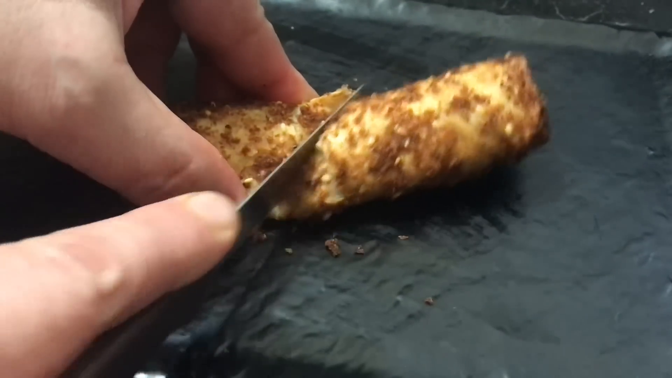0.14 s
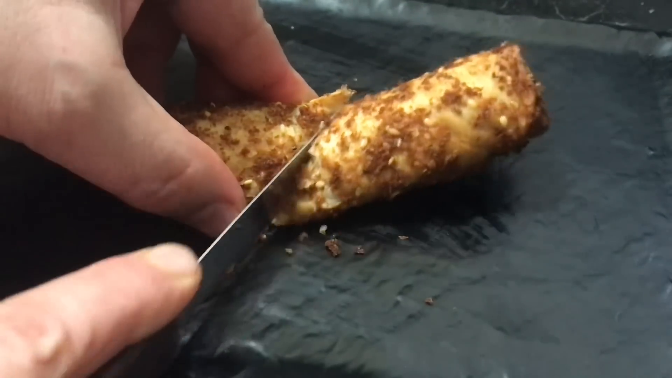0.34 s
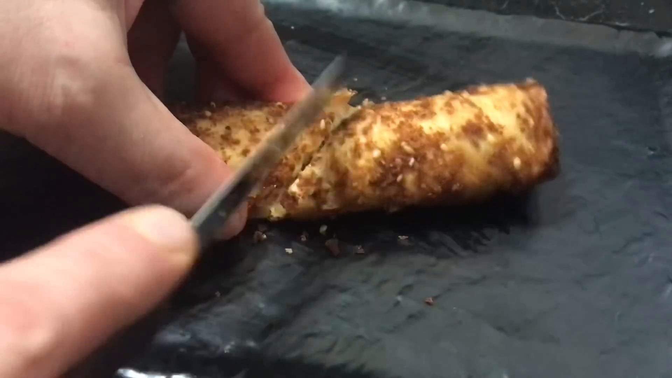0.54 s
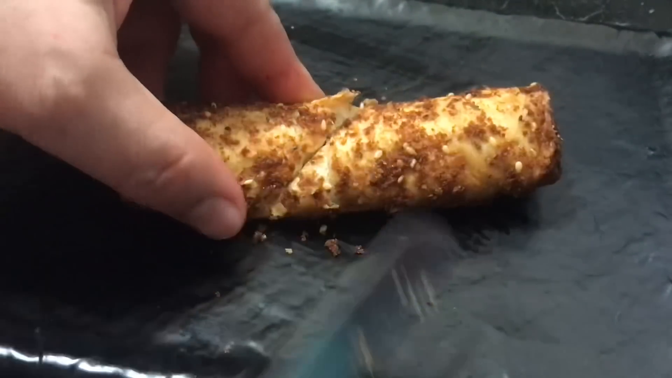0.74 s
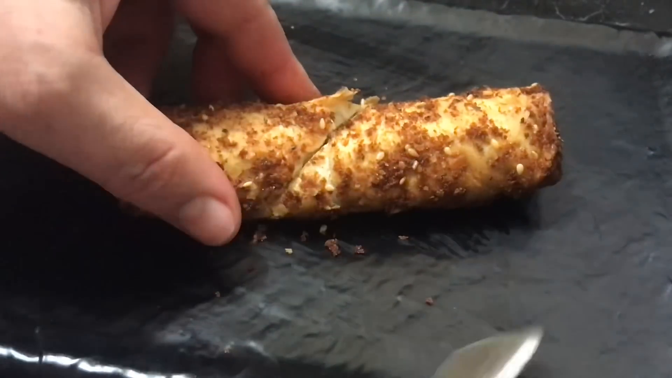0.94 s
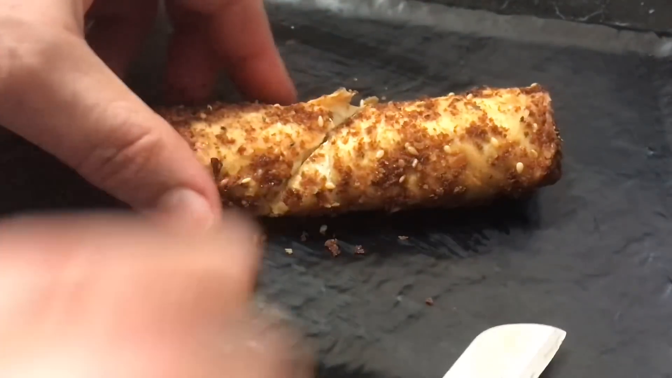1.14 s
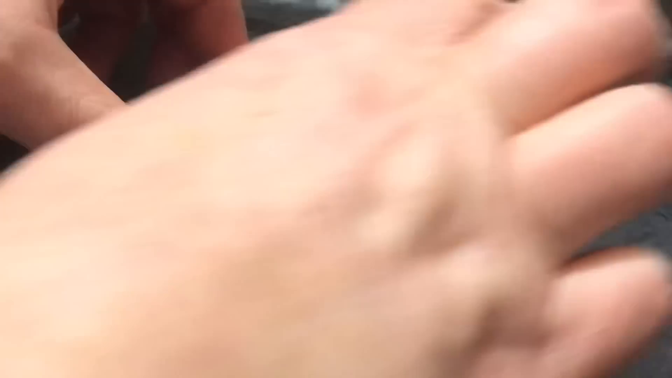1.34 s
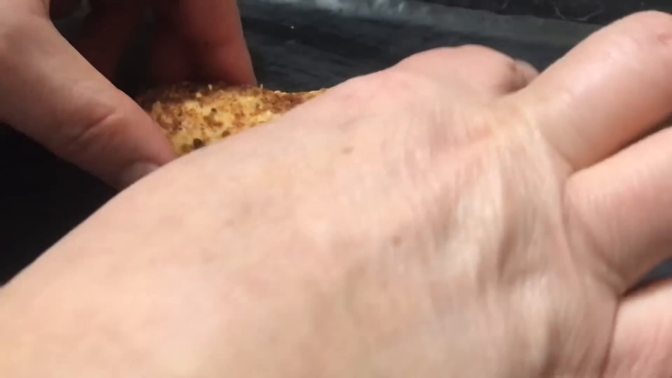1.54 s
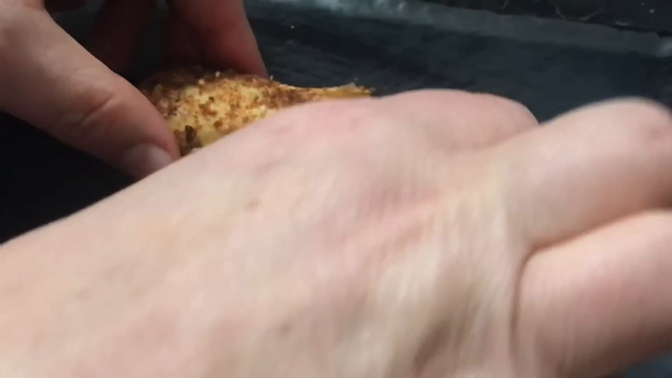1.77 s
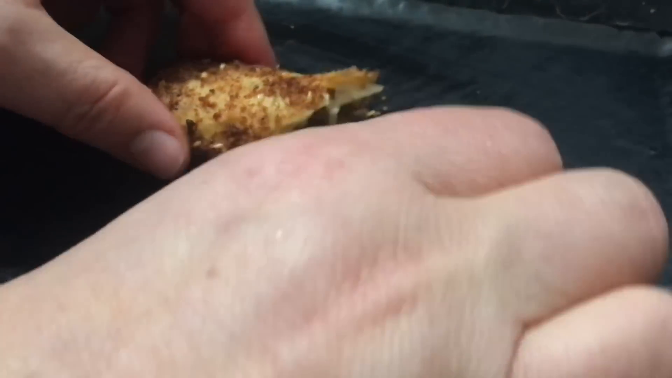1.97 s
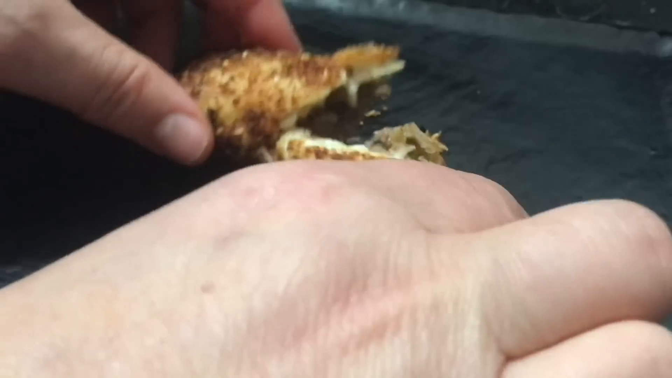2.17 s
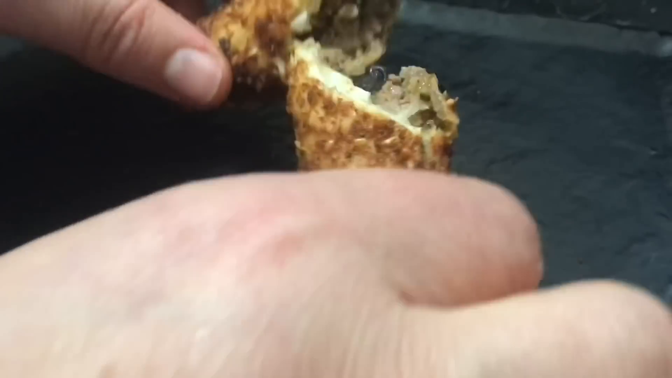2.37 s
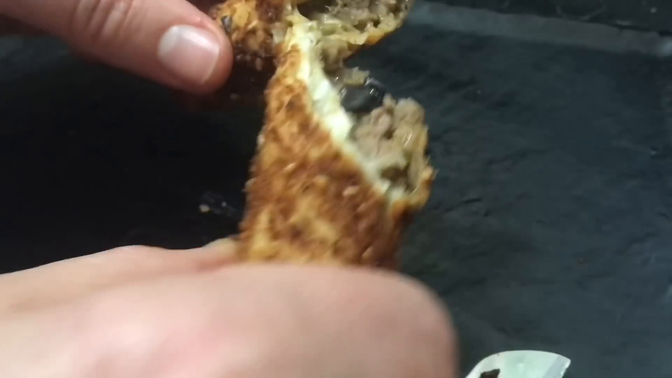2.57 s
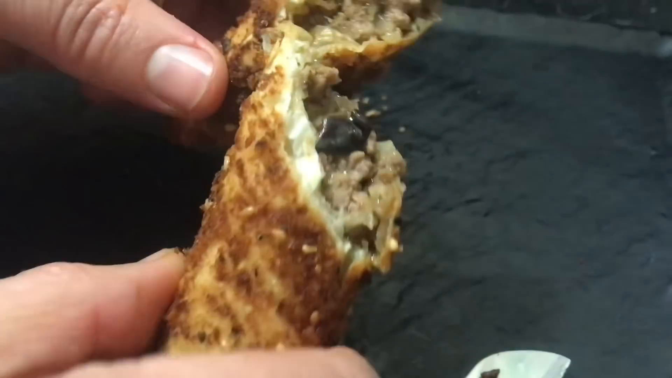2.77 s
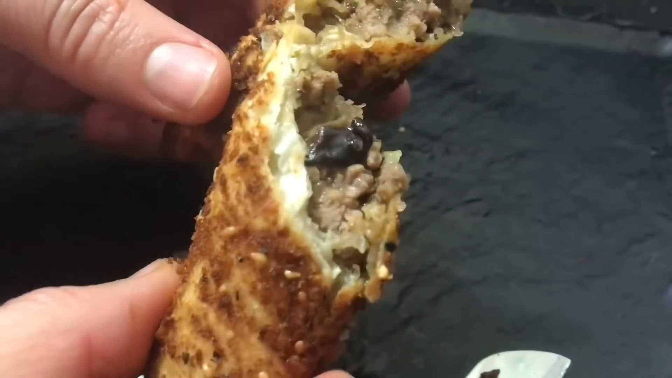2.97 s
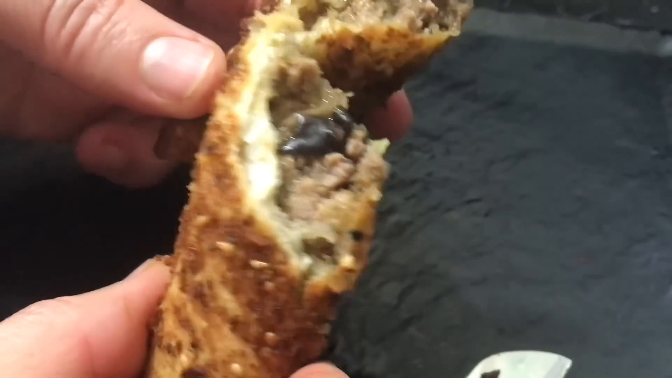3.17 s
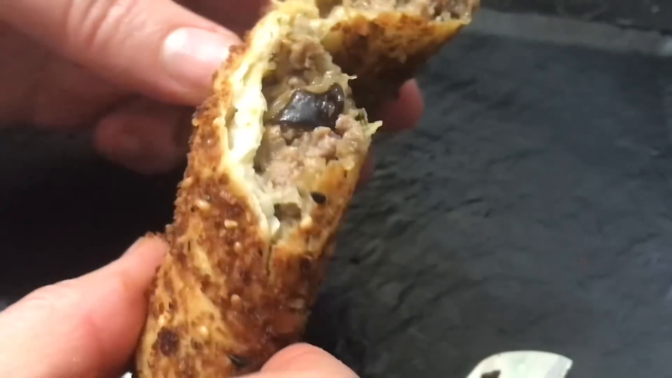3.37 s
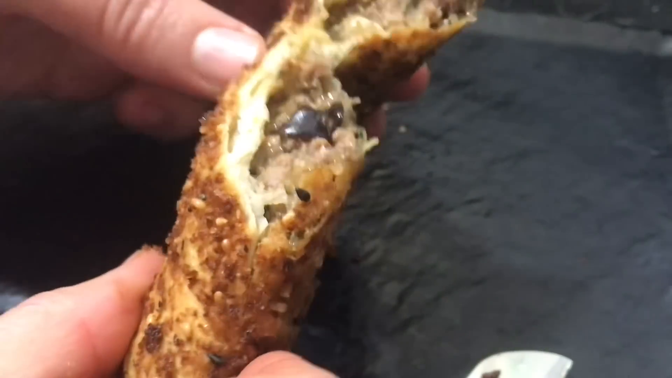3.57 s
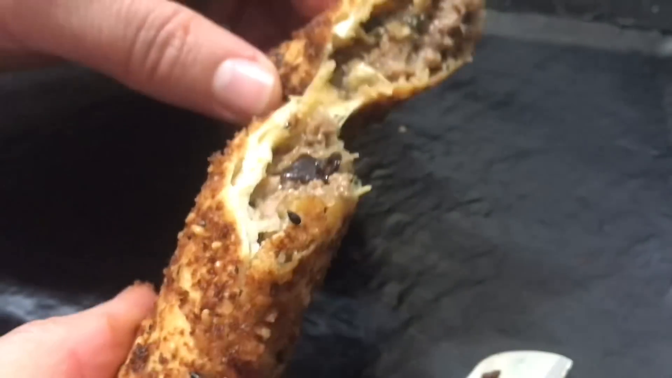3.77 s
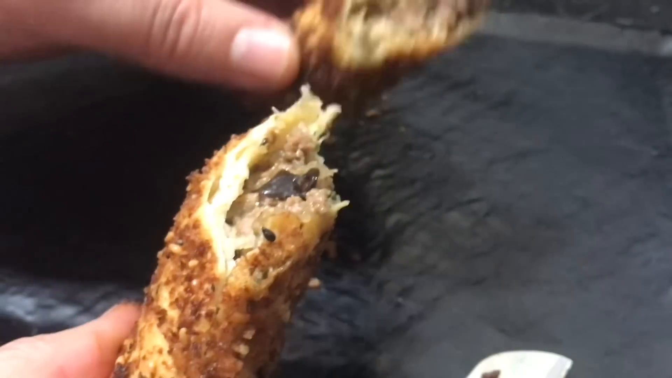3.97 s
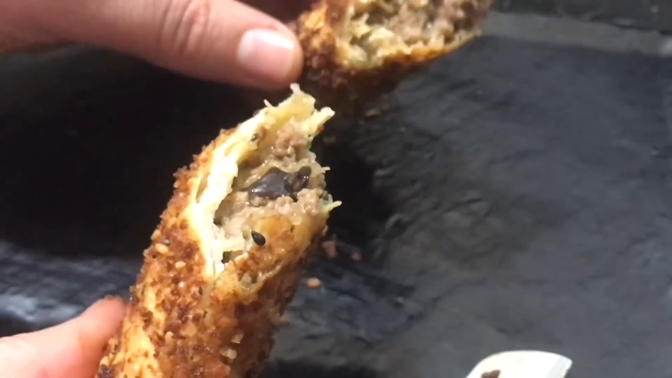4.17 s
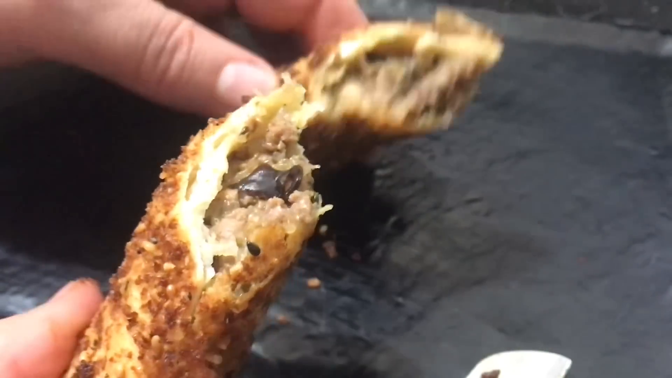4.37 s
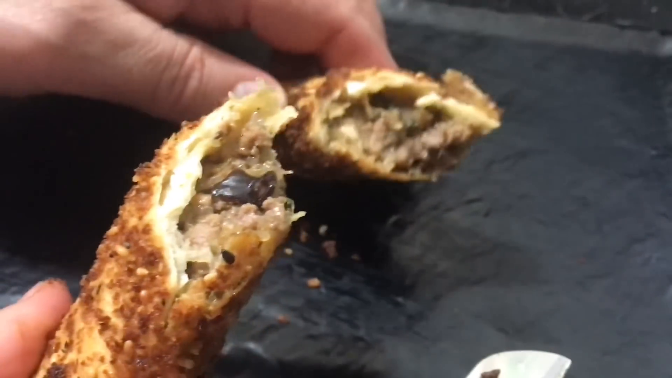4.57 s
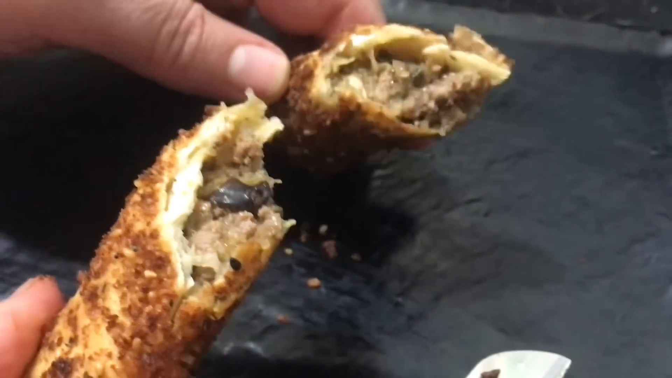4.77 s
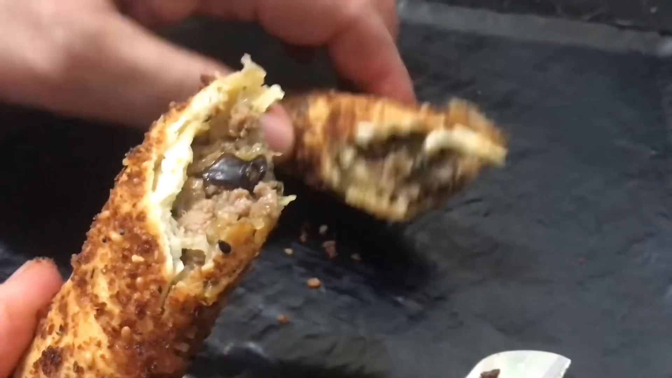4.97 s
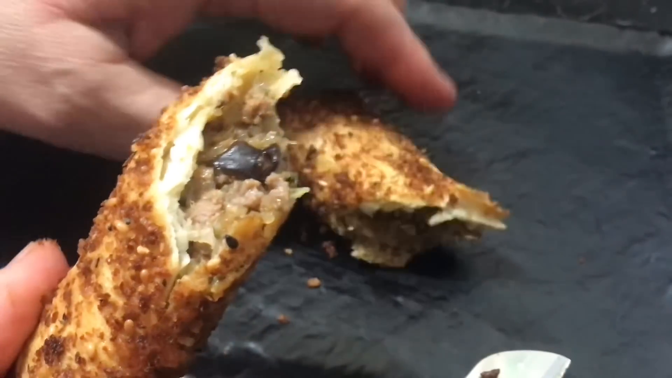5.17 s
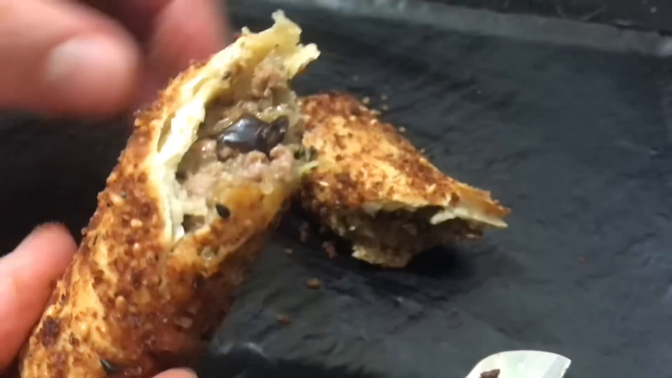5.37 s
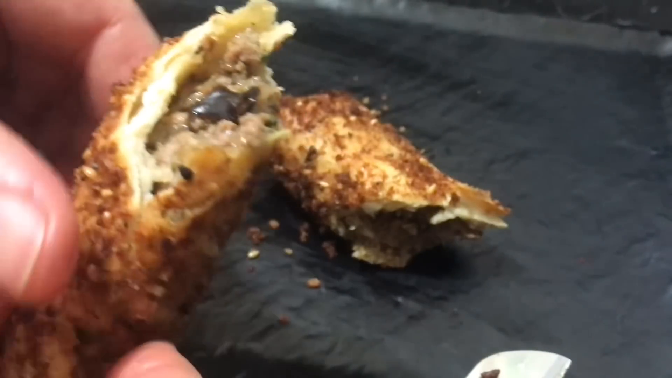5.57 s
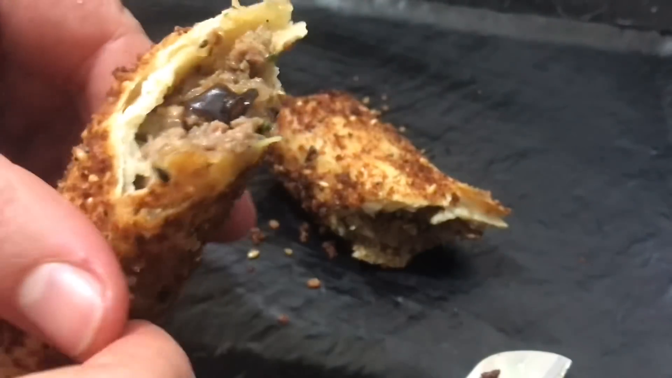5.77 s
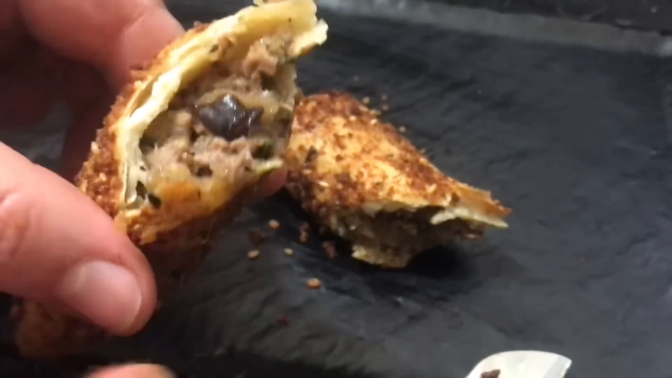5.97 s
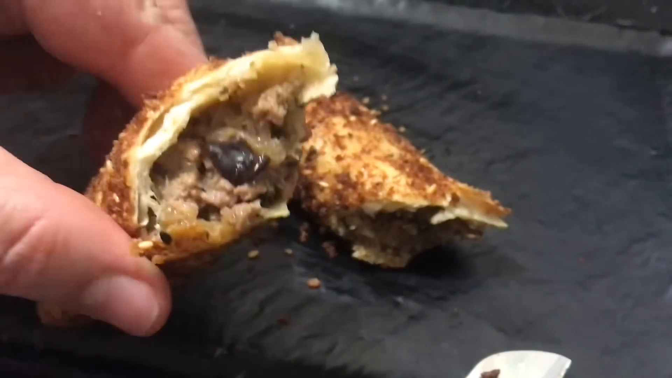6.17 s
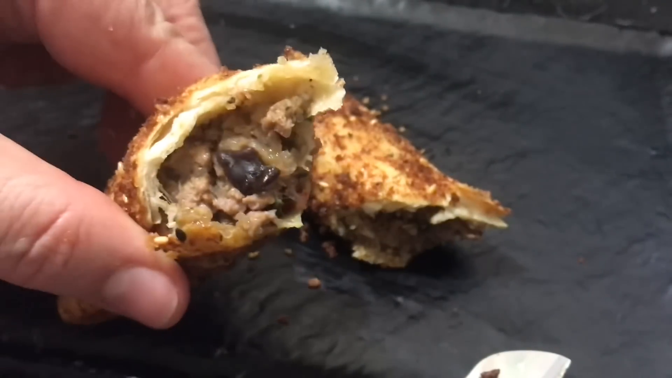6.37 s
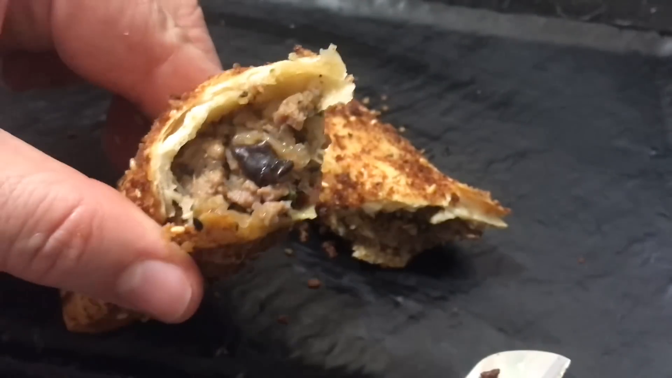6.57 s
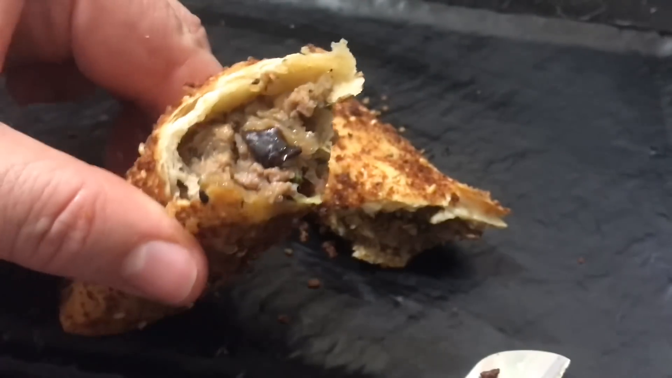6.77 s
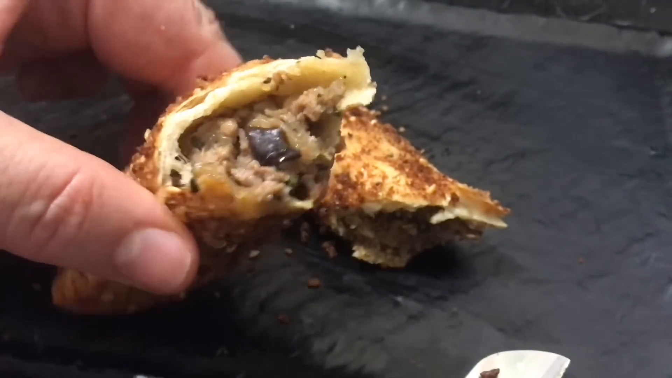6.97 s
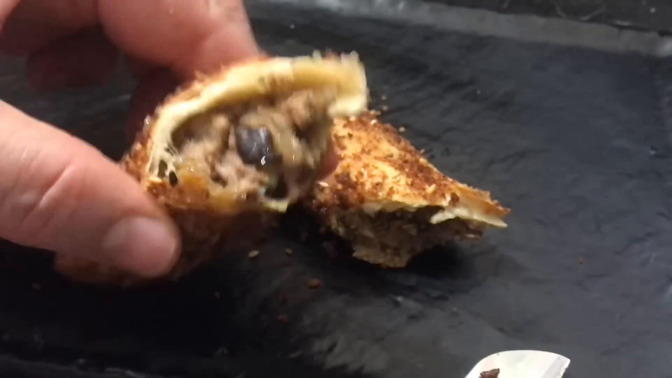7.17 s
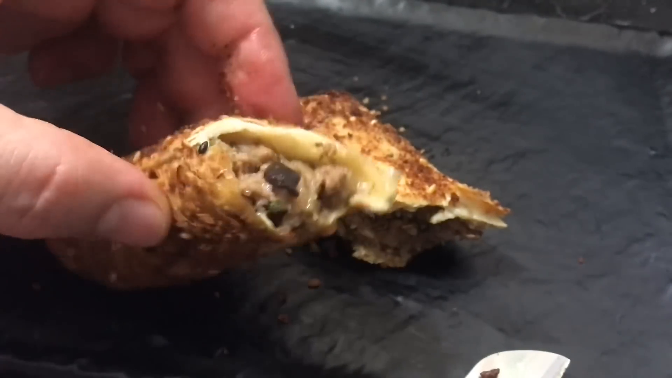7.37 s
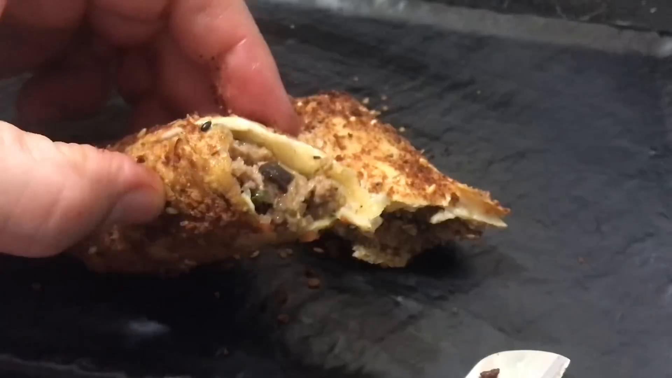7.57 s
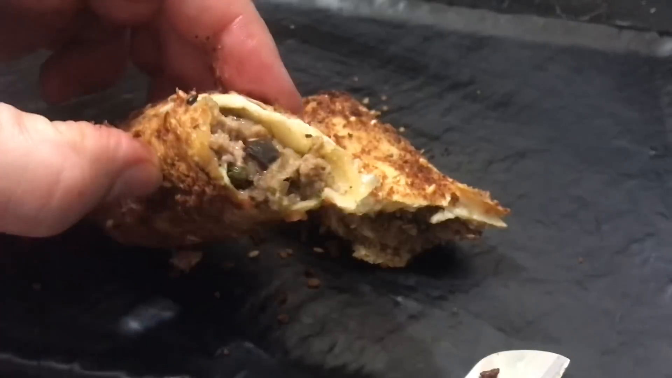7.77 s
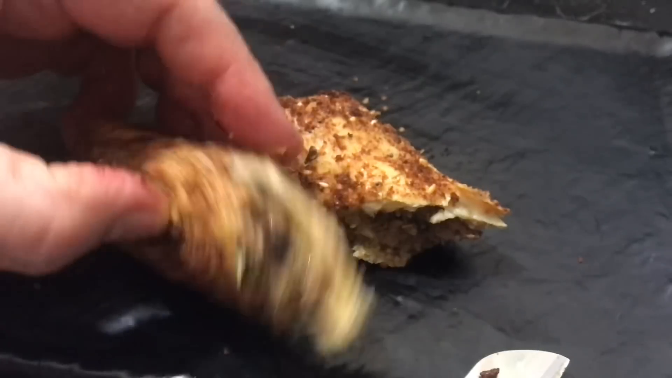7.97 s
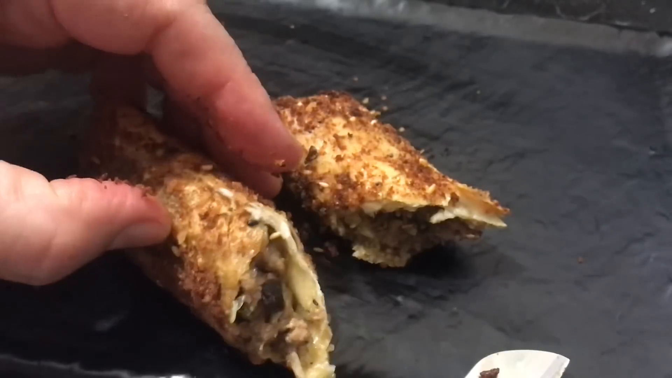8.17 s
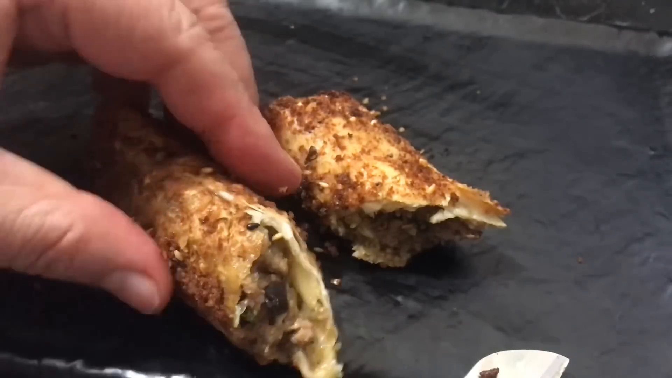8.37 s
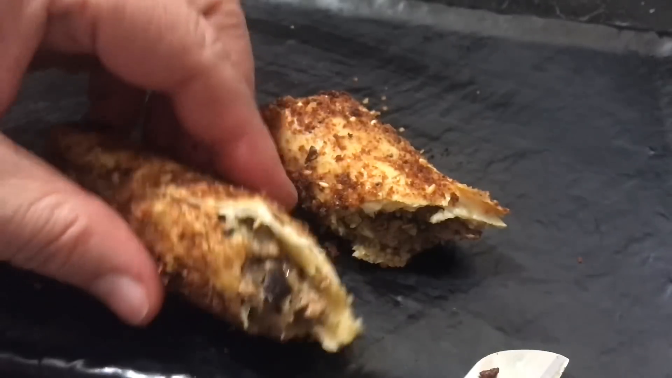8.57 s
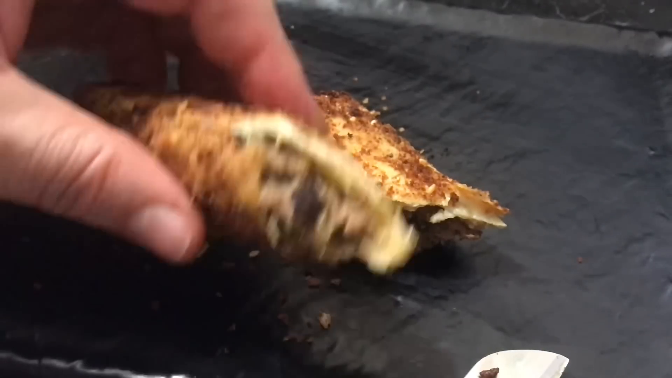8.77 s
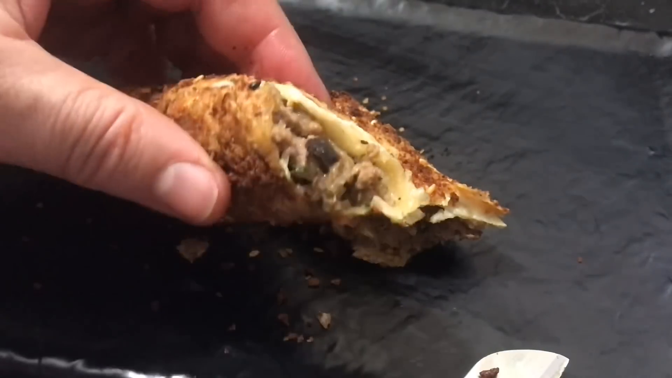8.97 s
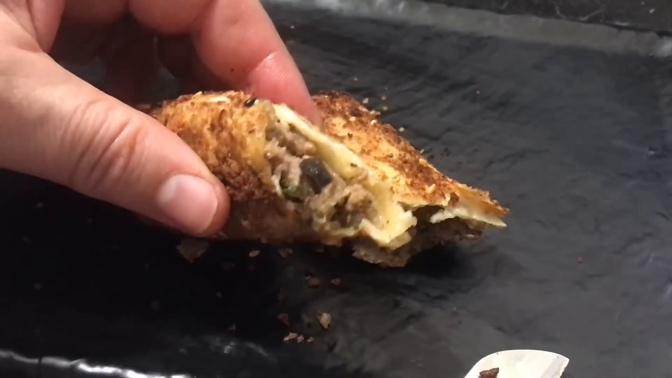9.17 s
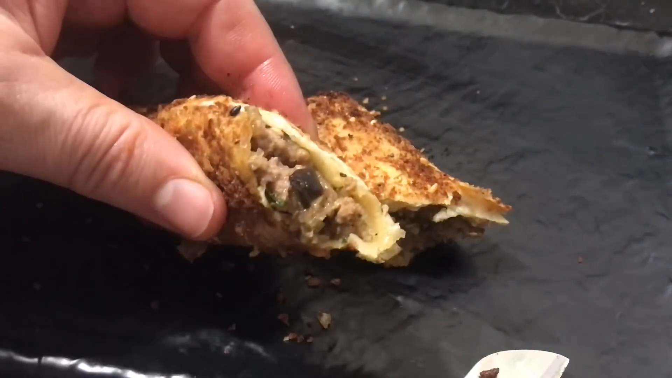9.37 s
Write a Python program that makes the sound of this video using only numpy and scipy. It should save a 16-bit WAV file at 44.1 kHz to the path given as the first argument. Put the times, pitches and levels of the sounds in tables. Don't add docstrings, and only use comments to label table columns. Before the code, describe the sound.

A knife saws crisp pastry, clatters brightly onto a slate, then hands tear, squeeze and turn the crackling crust over a faint kitchen rumble.

```python
import sys
import numpy as np
from scipy import signal
from scipy.fft import rfft, irfft
from scipy.io import wavfile
from scipy.ndimage import uniform_filter1d, map_coordinates

SR = 44100
rng = np.random.default_rng(int(sys.argv[2]) if len(sys.argv) > 2 else 0)


def wav_out(sig):
    wavfile.write(sys.argv[1], SR, np.round(np.clip(np.atleast_2d(sig).T, -1, 1) * 32767).astype(np.int16))


def gain_from_decibels(decibels):
    exponent = np.asarray(decibels, float) / 20
    return 10 ** exponent


N = 415863
T = np.arange(N) / SR

# pitch_hz, level_db (per Hz)
KITCHEN_COLOUR = [(30, -9), (50, -0.5), (110, 0.5), (200, -4), (330, -7), (500, -16), (1000, -15),
                  (2000, -18), (4000, -25.5), (6300, -27), (10000, -28), (13000, -29), (16000, -34.5)]
# start_s, level_db
MOTOR_SWELLS = [(0.0, -44), (0.15, -71), (0.42, -51), (0.55, -56), (1.21, -72.5), (1.31, -67), (6.22, -68),
                (6.49, -78.5), (7.85, -58.5), (9.43, -62)]

# pitch_hz, level_db, t60_s
EDGE_MODES = [(1164.4, 2, 0.034), (1235, -1, 0.1), (1260, -10, 0.037), (1500, -7.5, 0.052)]
MIDDLE_MODES = [(1790, -3.5, 0.072), (2200, -24.5, 0.06), (2370, -21.5, 0.087)]
PARTNER_MODES = [(1933, -10.5, .045), (1991, -4.5, 0.055)]
UPPER_MODES = [(2790, -11, 0.026), (3060, -13.5, 0.037), (3560, -8, 0.016), (3593, -0.5, 0.045),
               (3770, -10.5, .025), (3990, -10, 0.022), (4470, -14, 0.036)]
TOP_MODES = [(5200, -4, 0.0042), (5337, 2, 0.03), (5765, -2.5, .03), (6200, -9, .025), (6318, -14.5, 0.025),
             (6300, -14, 0.01), (7140, -15.5, 0.02), (8100, -15, 0.018), (9330, -25, 0.0087),
             (10570, -26, 0.024)]
# start_s, end_s, pressure_db
SAWING = [(0, .05, -45), (.05, .14, -56.5), (.145, .193, -47), (.2, .3, -51), (.3, .352, -46),
          (.352, .445, -50), (.445, .465, -64), (.465, .566, -52), (.566, .6, -64)]
BLADE_SLIDES = [(.958, 1, -23.5), (1.0, 1.04, -21.5), (1.04, 1.087, -26), (1.097, 1.116, -26.5),
                (1.127, 1.138, -25), (1.207, 1.245, -25.5)]
DRAGGING = [(.846, .935, -51), (1.425, 1.85, -63.5), (1.538, 1.655, -63), (1.687, 1.731, -56),
            (1.849, 1.89, -52), (1.89, 2.077, -56.5), (2.077, 2.172, -59), (1.954, 1.974, -49)]
SETTLING = [(4.484, 4.54, -66), (4.54, 4.62, -77.5), (5.005, 5.052, -61.5), (5.065, 5.138, -74.5),
            (5.163, 5.238, -69)]
ROLLING = [(7.239, 7.273, -55), (7.3, 7.53, -67), (7.855, 8.0, -68.5), (7.99, 8.07, -53), (8.12, 8.27, -76),
           (8.381, 8.469, -59), (8.524, 8.6, -64.5)]
# strokes, partner_db, edge_db, upper_db,
# top_db, crumb_scrape_db
RUBBING = [(SAWING, 0, -10.5, -2, -0.79, 8.7), (BLADE_SLIDES, -4.5, -26, -12.5, -16, -20),
           (DRAGGING, 0.98, -8, -6.5, -5, 7), (SETTLING, -2, 4, 5.3, -1, 4.4),
           (ROLLING, 0.89, -11, 0, -1, 9.6)]
# start_s, middle_peak_db, then partner_db, upper_db, top_db
BOUNCES = [(0.8546, 2.5, -3.5, -15, -13.5), (0.9519, -17, 0, 5.5, 4), (0.956, -16.5, 0.5, 2.5, 3),
           (0.97, -17.5, -2.5, -1.5, -9.5), (0.9982, -13.5, 0, -7, -8.5), (1.0062, -13.5, -3, -7, -11),
           (1.016, -17.5, -2, -4, -9.5), (1.032, -23, -2.5, -9, -13.5), (1.043, -21.5, -0.5, -10.5, -18),
           (1.091, -39, 0.5, 6.5, 4.5), (1.1243, -16.5, -2.5, 6, 9.5), (1.1269, -19, -3, 12.5, 4.5),
           (1.153, -7, 0.5, -5, 1), (1.173, -16, 0.5, 1, 8.5), (1.1758, -4, 2.5, -3.5, 4.5),
           (1.2062, -13.5, 1.5, -1, -2), (1.2095, -18.5, 1, -2, 4), (1.2283, -21, 0, 2.5, 3.5)]
# start_s, middle_peak_db, then edge_db, upper_db, top_db
LANDINGS = [(0.0044, -31, -3, -3.5, -2.5), (0.147, -31.5, -37, -18, -13), (0.3524, -24, -7, -8.5, -12),
            (0.42, -38.5, 5.5, -24, -25), (1.962, -31, -11, -16, -13), (2.181, -42, -5, -12.5, -22),
            (2.188, -39.5, -1, -9.5, -24), (2.411, -52.5, -18, -7, -14), (4.4779, -49, 16.5, 2.5, -9),
            (5.005, -41.5, 11, 9.5, 1), (5.075, -66, 5, 11.5, 4), (5.1674, -49.5, 3, -3, 1),
            (5.19, -58, -6, 8, -2), (7.267, -55, 2, 3, -8), (7.3215, -58, -10, 6, -3),
            (7.376, -50.5, -15, -2, 2), (8.0049, -44.5, 3, 3.5, -5), (8.0338, -26.5, -15, -9, -14),
            (8.0528, -41, -16, 8.5, -12), (8.386, -61, -17, -2, 0), (8.3997, -39, -34, -5.5, -25),
            (8.5271, -42, -18, 1.5, -14), (8.551, -40, -24, -5, -9)]

# start_s, peak_db, shard_pitch_hz, treble_db (against the shard's ring)
CUT_CRACKS = [(0.0064, -28.5, 1970, -18), (0.1024, -38, 5940, -10), (0.1435, -44, 11500, -7),
              (0.2414, -35, 3320, -16), (0.2934, -46, 2930, -8), (0.3545, -21, 1740, -48),
              (0.3639, -29, 1850, -27), (0.4194, -33, 1960, -41), (0.4826, -40, 3400, -41),
              (0.5275, -48, 4260, -28), (0.5313, -37, 4130, -28), (0.5615, -32, 2270, -17),
              (1.4682, -51, 3530, -27), (1.8535, -35.5, 1965, -22), (1.8792, -33, 2020, -18),
              (1.9234, -40, 1980, -24), (1.9635, -42, 1890, -39), (1.9964, -52, 3320, -23),
              (2.0037, -43, 8300, -15.5), (2.0446, -48, 3530, -16), (2.0496, -34.5, 4180, -19),
              (2.063, -35, 3640, -20), (2.1793, -40, 1910, -32), (2.191, -42, 1860, -45),
              (2.2691, -49, 4220, -17), (2.2821, -47, 3410, -21.5), (2.3118, -42, 3010, -16),
              (2.3221, -41.5, 3190, -20.5), (2.4117, -50, 1890, -22.5), (2.4428, -46, 3080, -11),
              (2.478, -51, 6030, -12), (2.4984, -49.5, 4060, -11), (2.5134, -45, 2670, -16),
              (2.5838, -46, 4480, -12), (2.5933, -54.5, 4060, -22), (2.6142, -47, 8440, -7),
              (2.6242, -39.5, 2020, -13.5), (2.6391, -40, 4400, -8), (2.655, -49.5, 4130, -21),
              (2.6639, -46.5, 4350, -7.5)]
TORN_CRACKS = [(2.8307, -49.5, 2310, -20.5), (2.862, -51.5, 4260, -9), (2.8691, -52.5, 2240, -22),
               (2.882, -39, 2370, -11.5), (2.8877, -40, 2890, -15), (2.8964, -38, 5340, -9),
               (2.9024, -39, 2210, -18), (2.9387, -43, 4570, -8), (2.9747, -49.5, 3060, -24),
               (2.9934, -44.5, 5230, -19), (3.0128, -47.0, 2500, -15), (3.0217, -42, 2360, -17),
               (3.0277, -41.5, 2100, -20), (3.0439, -45, 1890, -7.5), (3.0635, -43, 2350, -31),
               (3.1379, -33.5, 2230, -14), (3.1795, -45, 2480, -22), (3.2105, -35, 3230, -15),
               (3.2149, -43, 4250, -17), (3.2387, -28.5, 5510, -25.5), (3.2422, -46, 6930, -2.5),
               (3.26, -34, 2020, -17.5), (3.2722, -52, 5430, -11), (3.2854, -51, 4350, -19),
               (3.3147, -50.5, 4950, -20), (3.5187, -48, 2370, -21), (3.5875, -52, 2370, -19.5),
               (3.6266, -45.5, 5990, -7), (3.6547, -42, 8830, -3), (3.6754, -46.5, 3660, -17),
               (3.6944, -45.5, 3960, -2), (3.7011, -44.5, 2520, -15), (3.7365, -45.5, 2380, -20),
               (3.7534, -44, 2560, -5.5), (3.7814, -44.5, 4300, -17.5), (3.8993, -41.5, 2630, -5.5),
               (3.9548, -46.5, 2330, -14.5), (3.9786, -43.5, 5000, -13), (3.9966, -26.5, 2740, -9.5)]
LAID_CRACKS = [(4.3866, -52, 4120, -14), (4.4794, -42, 1500, -34), (4.5078, -40.5, 1510, -12),
               (4.5313, -56, 2200, -14), (4.6324, -52, 5900, -23), (4.787, -48.5, 4310, -12),
               (5.0046, -29, 3530, -17), (5.1563, -44.5, 3270, -23.5), (5.1675, -39, 1860, -25),
               (5.1849, -50, 3480, -26), (5.2159, -43.5, 1510, -23), (5.3867, -50, 3960, -14)]
SQUEEZED_CRACKS = [(5.7375, -48, 12500, -5), (5.752, -41.5, 1990, -19.5), (5.7605, -46, 12500, -4),
                   (5.786, -46.5, 4460, -13), (5.8644, -45, 2150, -21), (5.8912, -45, 5040, -12),
                   (5.901, -53, 5380, -13.5), (5.9344, -56, 3360, -14), (5.9948, -45.5, 5860, -16),
                   (6.0314, -47, 2215, -23), (6.0675, -47.5, 4780, -26.5), (6.0782, -45, 3960, -12.5),
                   (6.11, -47.5, 4130, -10), (6.165, -39, 5860, -9.5), (6.223, -33, 2280, -10.5),
                   (6.236, -40, 2800, -21), (6.2467, -25.5, 2500, -13), (6.2662, -36, 2500, -7),
                   (6.2798, -42.5, 3140, -19), (6.2922, -31.5, 3790, -14), (6.3112, -31.0, 4050, -15),
                   (6.322, -29.5, 4200, -15), (6.3278, -38.5, 4390, -20.5), (6.339, -50, 4650, -22),
                   (6.3964, -45, 5510, -11), (6.4493, -34.5, 4930, -16), (6.4888, -62, 4950, -9),
                   (6.5454, -25, 3490, -15.5), (6.5557, -31.5, 3000, -17), (6.5757, -36, 6640, -26),
                   (6.5795, -40.5, 6120, -23), (6.6149, -54, 2370, -26), (6.6241, -40, 2800, -19),
                   (6.681, -31.5, 2500, -20), (6.7077, -18, 2300, -16), (6.8026, -40, 4180, -11.5),
                   (6.8097, -40.5, 3960, -16), (6.8156, -35.5, 2890, -11), (6.8209, -38, 3960, -21),
                   (6.8244, -37, 2670, -8), (6.842, -36.5, 2760, -17), (6.9074, -54, 5300, -19),
                   (6.9143, -52, 2670, -22)]
ROLLED_CRACKS = [(6.9891, -46.5, 2480, -11), (7.088, -45, 6480, -12), (7.117, -46, 5640, -21),
                 (7.157, -50.5, 2450, -19), (7.1763, -52, 2670, -17), (7.1963, -40.5, 6800, -15),
                 (7.241, -35.5, 3010, -23), (7.2457, -42, 5900, -10), (7.2491, -39, 4130, -16),
                 (7.2624, -33, 2540, -19), (7.2676, -35, 2070, -36), (7.2951, -53, 2110, -19),
                 (7.3217, -50, 3620, -25), (7.3753, -43, 5520, -10), (7.395, -42, 2360, -24),
                 (7.4261, -42.5, 3390, -16), (7.5594, -39, 1510, -15), (7.5998, -49.5, 2410, -8),
                 (7.6924, -43.5, 2410, -17), (7.9938, -36, 1580, -23), (8.0037, -34, 2660, -16),
                 (8.0137, -30, 1930, -25), (8.036, -18, 3540, -20.5), (8.0518, -23.5, 1850, -18),
                 (8.2341, -45, 3640, -29), (8.385, -41, 3590, -23), (8.4006, -34.5, 1990, -17),
                 (8.4052, -46, 2100, -31), (8.4441, -35, 2020, -19), (8.4646, -34.5, 2110, -17)]
TURNED_CRACKS = [(8.5266, -30.5, 1850, -16.5), (8.5525, -34.5, 2040, -38), (8.5738, -35, 8440, -6),
                 (8.6671, -47.5, 4510, -17.5), (8.7517, -40.5, 4030, -15), (8.8108, -47.5, 2540, -30),
                 (8.8185, -51, 5900, -16.5), (8.866, -43.5, 5280, -24), (8.8765, -50.5, 5860, -18),
                 (8.8888, -46.5, 4260, -12), (8.9299, -45.0, 4390, -11), (8.952, -37.5, 4300, -12.5),
                 (8.9588, -43, 5340, -25), (8.9698, -36, 5430, -16), (8.9781, -28.5, 5450, -26),
                 (8.983, -42, 5510, -16.5), (8.988, -39, 5210, -11), (9.0294, -42, 3830, -7),
                 (9.0365, -35.5, 4200, -11), (9.0697, -40.5, 4180, -20), (9.1254, -46.5, 3920, -16),
                 (9.1318, -45.5, 4310, -17), (9.1534, -44, 6980, -8), (9.197, -31.5, 4200, -13.5),
                 (9.2033, -28.5, 4330, -14.5), (9.2132, -48, 7240, -13), (9.2271, -43, 8900, -5),
                 (9.2547, -48.0, 4090, -8), (9.2738, -48, 5730, -2), (9.2928, -48.0, 8870, -9),
                 (9.366, -40, 2630, -25), (9.372, -38, 1940, -9), (9.3942, -48, 5430, -13.5),
                 (9.4149, -49, 2970, -3)]
# start_s, level_db
CRUMB_GRIP = [(0, -62.5), (.5, -65), (.65, -76), (1.4, -79.5), (1.9, -67.5), (2.3, -81), (3.2, -70.5),
              (3.45, -80), (3.9, -77), (4.2, -86), (5.6, -84.5), (6.28, -70), (6.95, -81.5), (7.3, -70),
              (7.9, -85.5), (8.03, -67.5), (8.2, -81), (9.43, -71.5)]

# start_s, knock_peak_db, boom_db
THUDS = [(0.019, -49, -50), (0.279, -31.5, -52), (0.354, -30, -36.5), (0.413, -29.5, -38),
         (0.618, -41.5, -51.5), (0.862, -25.5, -67), (0.954, -31.5, -75), (0.997, -35, -66),
         (1.128, -30.5, -44), (1.179, -30.5, -44.5), (1.209, -52, -76), (4.479, -46.5, -64),
         (5.008, -48, -70), (7.271, -35.5, -72), (7.284, -38, -67.5), (7.317, -38.5, -69),
         (7.346, -48, -68), (7.856, -47.5, -69), (8.033, -38, -38)]
# pitch_hz, level_db, t60_s
WORKTOP_MODES = [(140, -14, 0.03), (245, -4.5, 0.083), (339, -5, 0.06), (470, -5.5, 0.045),
                 (590, -8.5, 0.062)]
# pitch_hz, level_db, t60_s
BOOM_MODES = [(48, 3, 0.4)]


def band(x, lo_hz, hi_hz, order=2):
    return signal.sosfilt(signal.butter(order, [lo_hz, hi_hz], "band", fs=SR, output="sos"), x)


def unit(x):
    return x / np.sqrt(np.mean(x ** 2))


def noise_band(lo_hz, hi_hz, order=2):
    return unit(band(rng.standard_normal(N), lo_hz, hi_hz, order))


def walk(rate_hz):
    hold = int(SR / rate_hz)
    steps = np.repeat(rng.standard_normal(N // hold + 1), hold)
    return unit(uniform_filter1d(uniform_filter1d(steps, hold), hold)[:N])


def ring(force, modes):
    t = np.arange(SR // 2) / SR
    response = sum(gain_from_decibels(db - 60 * t / t60) * np.sin(2 * np.pi * hz * t) for hz, db, t60 in modes)
    return signal.oaconvolve(force, response)[:N]


def place(times, shapes):
    where = (np.asarray(times) * SR).astype(int)[:, None] + np.arange(shapes.shape[1])
    return np.bincount(where.ravel(), shapes.ravel(), N + shapes.shape[1])[:N]


def columns(rows):
    return (column[:, None] for column in np.transpose(rows))


def colour(spectrum, size):
    hz, db = np.transpose(spectrum)
    return gain_from_decibels(np.interp(np.log(np.fft.rfftfreq(size, 1 / SR) + 1), np.log(hz), db))


def kitchen():
    air = unit(irfft(rfft(rng.standard_normal(N)) * colour(KITCHEN_COLOUR, N), N))
    air = air * gain_from_decibels(-65.5 + 0.7 * walk(1.9))
    throb = noise_band(39, 58, order=1) * gain_from_decibels(-68 + 4.1 * walk(3.5))
    cabinet = gain_from_decibels(-81) * noise_band(322, 345, order=1)
    drone = noise_band(87, 140) + 0.19 * noise_band(130, 165)
    drone = drone * gain_from_decibels(np.interp(T, *np.transpose(MOTOR_SWELLS)) - 4.5)
    return air + throb + cabinet + drone


def rubbing():
    grit_db = 3 * rng.exponential(size=N) + 2.2 * walk(150) + 2.2 * walk(45)
    grit = unit(rng.standard_normal(N) * gain_from_decibels(grit_db))
    wander = gain_from_decibels(1.2 * np.array([walk(22) for _ in range(6)]))
    strokes = np.zeros((6, N))
    for rows, *share_db in RUBBING:
        for start, end, press_db in rows:
            pressure = gain_from_decibels(press_db + np.array([0, *share_db]))
            strokes[:, int(start * SR):int(end * SR)] += pressure[:, None]
    return uniform_filter1d(strokes, size=300) * grit * wander


def slab(force, modes):
    free = (T > 0.84) & (T < 1.4)
    pressed = [(hz, db + 1, t60 * 0.75) for hz, db, t60 in modes]
    return ring(force * free, modes) + ring(force * ~free, pressed)


def slate():
    bounce_edge_db, landing_partner_db = -34.5, 3.5
    blows = [(s, db, pair, bounce_edge_db, up, top) for s, db, pair, up, top in BOUNCES]
    blows += [(s, db, landing_partner_db, edge, up, top) for s, db, edge, up, top in LANDINGS]
    s, db, pair_db, edge_db, upper_db, top_db = columns(blows)
    start = s[:, 0]

    t = np.arange(600) / SR / 0.0009
    chatter = rng.standard_normal((len(s), len(t))) * t * np.exp(-t)
    chatter = chatter / np.sqrt(np.sum(chatter ** 2, axis=1, keepdims=True))
    knock = 0.21 * chatter + (np.arange(len(t)) == 30)

    rub_middle, rub_pair, rub_edge, rub_upper, rub_top, scrape = rubbing()
    middle = place(start, knock * gain_from_decibels(db - 5)) + gain_from_decibels(-23) * rub_middle
    pair = place(start, knock * gain_from_decibels(db + pair_db - 4)) + gain_from_decibels(-21) * rub_pair
    edge = place(start, knock * gain_from_decibels(db + edge_db - 9.5)) + gain_from_decibels(-20.5) * rub_edge
    upper = place(start, (chatter + 0.6 * knock) * gain_from_decibels(db + upper_db - 8.5)) + gain_from_decibels(-24) * rub_upper
    top = place(start - 0.0008, chatter * gain_from_decibels(db + top_db - 5.5)) + gain_from_decibels(-27.5) * rub_top

    lesser = [(2200 * 2 ** (1.25 * a), -14 - 14 * b, 0.03) for a, b in rng.random((24, 2))]
    tone = band(slab(middle, MIDDLE_MODES) + slab(pair, PARTNER_MODES), 1700, 3600)
    tone = tone + band(slab(edge, EDGE_MODES), 1100, 4000)
    tone = tone + band(slab(upper, UPPER_MODES + lesser), 2700, 8500)
    tone = tone + band(slab(top, TOP_MODES), 5000, 11000)
    tone = map_coordinates(tone, [np.arange(N) + 2.5 * walk(30)], mode="nearest")

    rasp = gain_from_decibels(23) * band(upper, 1900, 3800)
    rasp = rasp + gain_from_decibels(17.5) * band(edge, 352.75, 1600)
    rasp = rasp + gain_from_decibels(5) * band(middle, 1800, 3900)
    rasp = rasp + gain_from_decibels(-8) * band(scrape, 1700, 6800, order=3)
    rasp = rasp + gain_from_decibels(8) * band(top, 4500, 7000)
    worktop_answer = band(ring(gain_from_decibels(-3.5) * edge, WORKTOP_MODES), 110, 1100)
    return tone + rasp + worktop_answer


def snaps(rows):
    size, lead = 640, 64
    s, db, hz, treble_db = columns(rows)
    ms = np.maximum(np.arange(size) - lead, 0) / SR * 1000
    shape = np.minimum(ms / 0.087, 1) * (np.exp(-ms / 0.34) + gain_from_decibels(-18) * np.exp(-ms / 3.8))
    burst = rfft(rng.standard_normal((len(s), size)) * shape)
    burst = burst / uniform_filter1d(np.abs(burst), size=15)

    bins_hz = np.fft.rfftfreq(size, 1 / SR) + 1
    octaves = np.log2(bins_hz / hz)
    treble_reach = np.abs(octaves) / np.maximum(np.log2(9500 / hz), 0.6)
    skirt_db = np.where(octaves < 0, 6.5 * octaves, (treble_db + 5) * treble_reach ** 0.96)
    skirt_db = skirt_db - 5 * np.maximum(np.log2(bins_hz / 11000), 0)
    shard_db = 4.5 / (1 + (octaves / 0.3) ** 2)
    snap = irfft(burst * gain_from_decibels(np.maximum(skirt_db, -40) + shard_db), size)
    snap = snap / np.abs(snap).max(axis=1, keepdims=True)
    return place(np.maximum(s[:, 0] - lead / SR, 0), gain_from_decibels(db - 0.2) * snap)


def crust():
    when, force, pitch, dullness = rng.random((4, 3000))
    s = when * (N - 1) / SR
    squeeze_db = np.interp(s, *np.transpose(CRUMB_GRIP)) + 3 * walk(25)[(s * SR).astype(int)]
    db = squeeze_db + 10.5 + np.minimum(-4.5 * np.log(force), 10.5)
    tiny = np.transpose([s, db, 2100 * 2 ** (1.6 * pitch), -10 - 20 * dullness])
    big = CUT_CRACKS + TORN_CRACKS + LAID_CRACKS + SQUEEZED_CRACKS + ROLLED_CRACKS + TURNED_CRACKS
    return snaps(big) + snaps(tiny)


def worktop():
    s, knock_db, boom_db = columns(THUDS)
    t = np.arange(900)
    push = 1.36 * t / 18 ** 2 * np.exp(-1.65 * t / 18)
    push = push + 0.02 * rng.standard_normal((len(s), len(t))) * np.exp(-t / 260)
    knock = ring(place(s[:, 0], push * gain_from_decibels(knock_db + 1.5)), WORKTOP_MODES)
    boom = ring(place(s[:, 0], push * gain_from_decibels(boom_db - 1.5)), BOOM_MODES)
    return band(knock, 110, 1500) + boom


def tile_echo(near):
    t60_s, level_db = 0.3, -17.5
    t = np.arange(SR // 2) / SR
    tail = band(rng.standard_normal(len(t)), 210, 10266, order=1) * gain_from_decibels(-60 * t / t60_s) * (t > 0.003)
    tail = tail / np.sqrt(np.sum(tail ** 2))
    return gain_from_decibels(level_db) * signal.fftconvolve(near, tail)[:N]


def scene():
    near = slate() + crust() + worktop()
    return (near + tile_echo(near) + kitchen())[None]


def band_limit(x):
    return signal.sosfilt(signal.butter(12, 16660, fs=SR, output="sos"), x)


def record(dry):
    heard = band(1.15 * np.tanh(dry / 1.15), 42, 16000, order=3)
    heard = signal.sosfilt(signal.ellip(8, 0.2, 60, 16300, fs=SR, output="sos"), heard)
    mix = heard - 0.39 * band(heard, 9900, 10900, order=1)
    return band_limit(mix)


dry = scene()
out = record(dry)
wav_out(out)
```